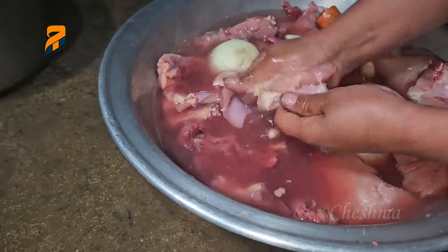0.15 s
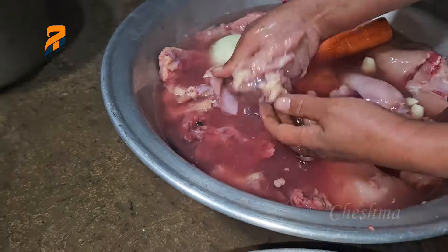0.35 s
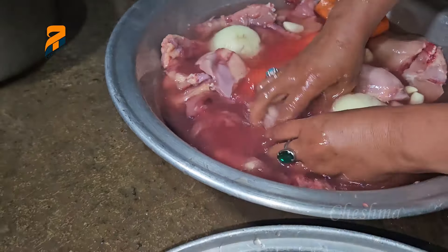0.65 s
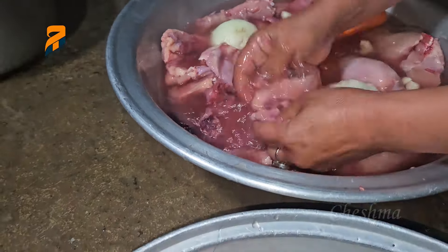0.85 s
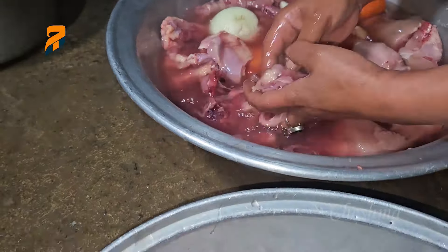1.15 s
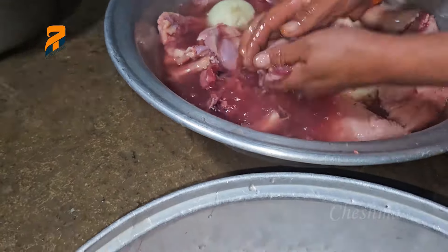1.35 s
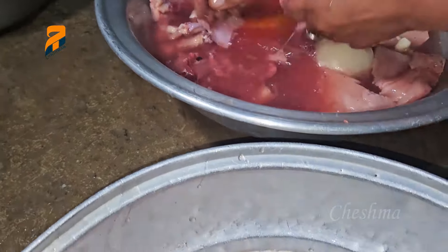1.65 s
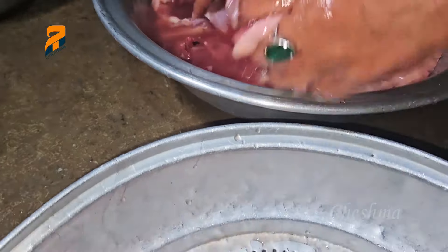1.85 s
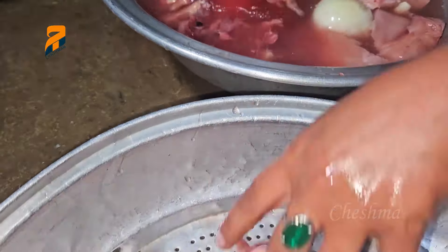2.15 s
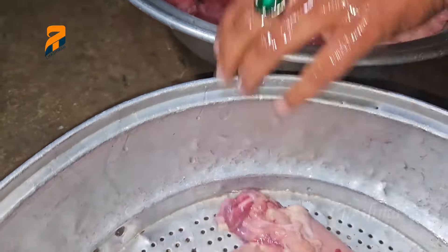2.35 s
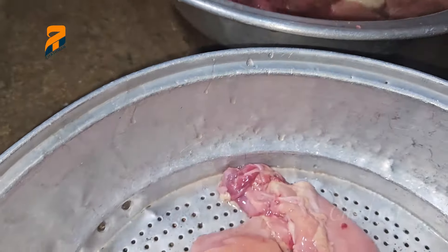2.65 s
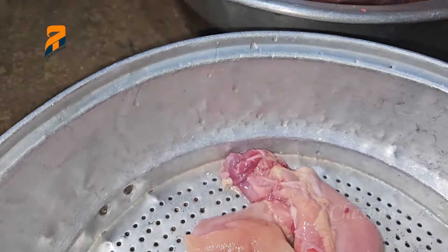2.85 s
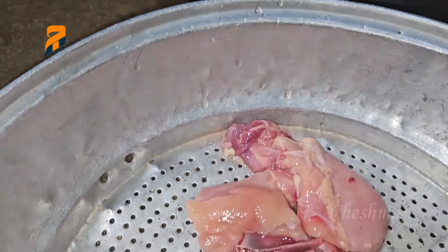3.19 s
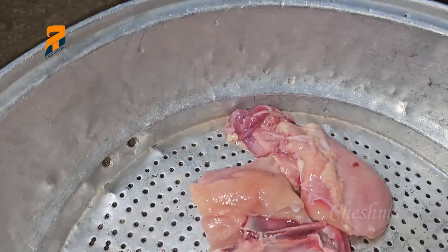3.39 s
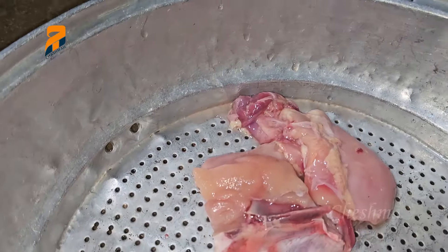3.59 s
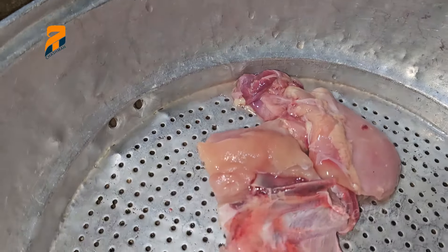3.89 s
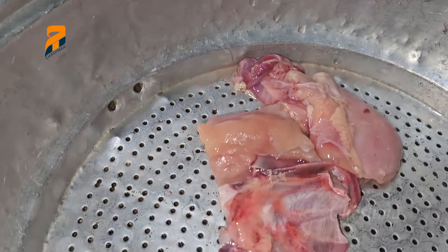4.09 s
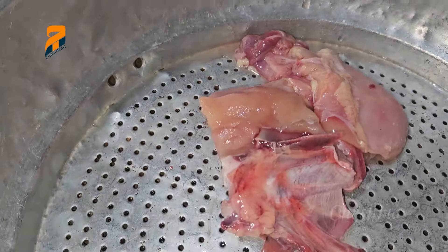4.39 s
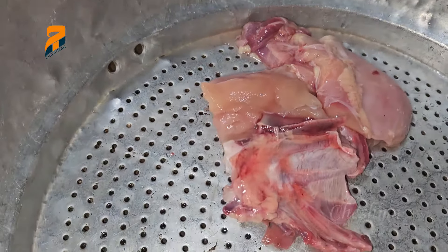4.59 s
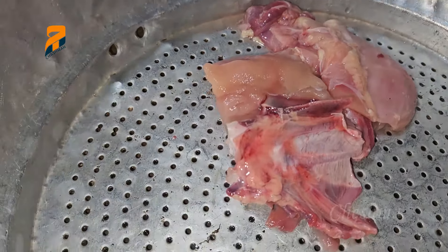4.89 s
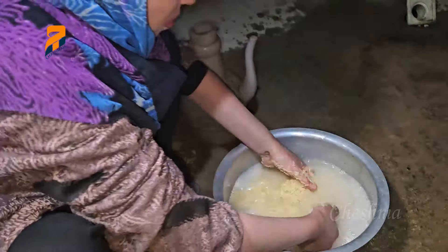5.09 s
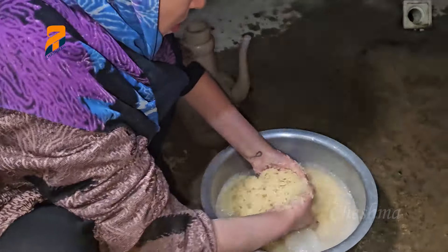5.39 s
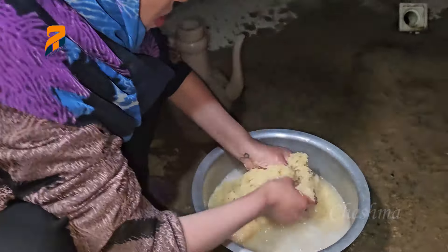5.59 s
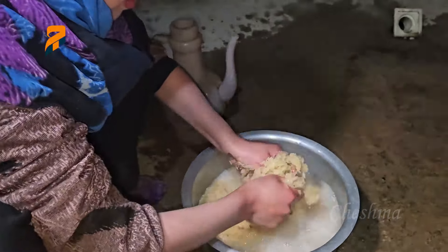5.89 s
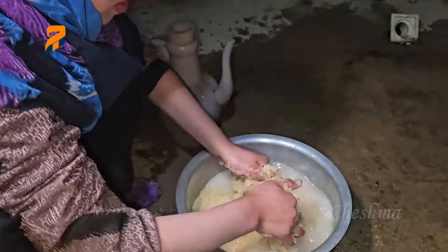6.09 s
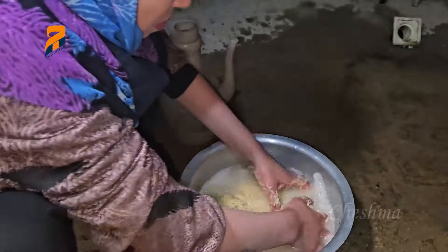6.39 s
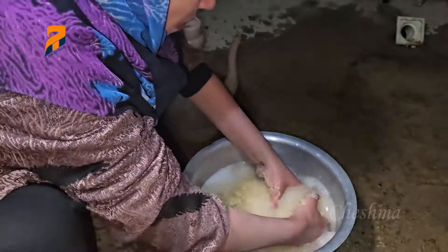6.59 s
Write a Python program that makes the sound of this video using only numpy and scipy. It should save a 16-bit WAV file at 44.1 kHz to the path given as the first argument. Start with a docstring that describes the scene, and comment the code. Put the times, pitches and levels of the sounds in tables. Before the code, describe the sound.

Close stereo sound of washing food in metal basins on a hard floor in a small room. Water swishes brightly from the start; a tiny wet squeak at 0.1 s leads into a heavy, rough, hollow shove at about 0.25 s, shaking the room's lowest tones. Splashes follow at 0.6 and 0.9 s, with a small rising bloop at 0.8. Hard, dry metal cracks strike at 0.7, 1.4, 2.1 and 2.4 s, among quick splashes and crowded drips from 2.2 to 2.6. The water thins around 3 s, with duller sloshing and a strong thud at 3.6. Another splash at 3.9 precedes a loud bright crack at 4.2, then plinking drops. Low rumble grows until about 5.3. A full splash and clustered heavy bumps land at 5.0-5.2 s. Afterwards rice is rubbed in soft, pulsing swishes, with faint knocks at 5.9 and 6.4.

```python
"""Water swishes, fizzes and drips as hands rinse meat and then rice in metal basins in a small hard room.
A wet finger squeaks, steps thud, heavy things are set down or dragged, and a ring or bone cracks on metal.
Water is filtered noise with resonant bubbles; drops are chirped bubbles; solids are struck modes.
The first heavy blow also rings low room modes; drops, bloops and cracks feed a diffuse reverberation.
Two microphone ports stand a hand apart, the right one read with a varying lag."""
import sys
import numpy as np
from scipy import signal
from scipy.io import wavfile
from scipy.ndimage import map_coordinates

SR = 44100
rng = np.random.default_rng(int(sys.argv[2]) if len(sys.argv) > 2 else 0)


def materialize(psi):
    """Save the field psi as 16-bit PCM at rate SR to the path in sys.argv[1].

    A 1-D psi becomes a single channel; in a 2-D psi each row is a channel.
    """
    bounded = np.clip(np.atleast_2d(psi).T, -1, 1)
    quanta = np.round(bounded * 32767).astype(np.int16)
    wavfile.write(sys.argv[1], SR, quanta)


N = 297234

# Stirring of the water by the hands: t/s, swish level/dB, slosh level/dB
STIRRING = [(0.0, -40, -74), (0.2, -50.5, -79), (0.36, -50, -69.5), (0.82, -48, -54), (1.05, -59.5, -67.5),
            (1.28, -58, -63.5), (1.55, -48.5, -76.5), (2.0, -56, -66), (2.31, -62.5, -67.5),
            (2.6, -55.5, -69), (2.95, -52.5, -81), (3.2, -60, -65), (3.7, -57, -63.5), (4.2, -47, -69.5),
            (4.5, -58, -65.5), (5.0, -59.5, -70), (5.3, -55, -58.5), (5.5, -60.5, -81), (5.8, -50.5, -70),
            (6.22, -48, -73), (6.42, -61, -62), (6.74, -62.5, -84.5)]
# Handfuls thrown up and falling back: middle of rise t/s, hold from there/s, swish level/dB, slosh level/dB
SPLASHES = [(0.413, 0.23, -53, -81), (0.628, 0.073, -40, -63), (0.901, 0.044, -45.5, -52),
            (1.533, .07, -53, -68.5), (1.71, 0.1, -42.5, -66), (2.051, 0.15, -49.5, -55.5),
            (2.333, 0.062, -47.5, -81), (2.454, 0.16, -52, -62.5), (2.607, 0.12, -46.5, -62.5),
            (2.785, 0.16, -46, -67.5), (3.315, 0.026, -68.5, -52.5), (3.484, 0.11, -59.5, -51.5),
            (3.929, 0.042, -43, -60), (4.122, 0.13, -48.5, -80), (4.833, 0.027, -73, -48.5),
            (5.075, 0.049, -40, -38.5), (5.631, 0.14, -48, -65.5), (5.853, 0.18, -49.5, -67.5),
            (6.079, 0.067, -42.5, -68)]
SPLASH_RISE_S, SPLASH_T60_S = 0.098, 0.14
# Relative noise density of the bright swish: f/Hz, level/dB per Hz
SWISH_SPECTRUM = [(600, -60), (1000, -25), (1500, -8), (2500, -8), (4000, -8), (7500, -9), (12000, -12.5),
                  (16000, -25.5)]
# Relative noise density of the dull slosh: f/Hz, level/dB per Hz
SLOSH_SPECTRUM = [(150, -26), (300, -2), (550, 0.5), (1000, -9), (2500, -26)]
# Correlation of left and right noise: f/Hz, likeness (0 to 1)
LIKENESS = [(100, 0.72), (300, 0.085), (700, 0.067), (2000, 0.02), (12000, 0.067)]
# Fizz of grains and droplets, relative to the swish
FIZZ_DB, FIZZ_PER_S, FIZZ_CYCLES = -8, 380, 18
# Lag between the ports and level of the far rumble over time: t/s, lag of the right port/ms, gain of the far
# rumble/dB
LAG_AND_RUMBLE = [(0, 0.25, 18), (1.2, 0.23, 19), (4.95, 0.31, 27), (5.0, -0.3, 29.5), (5.3, 0.081, 29),
                  (5.45, 0.0064, 11.5), (6.74, 0.051, 13.5)]
# Resonances of the far rumble: f/Hz, width/Hz, level before the gain/dB
RUMBLE_MODES = [(56.5, 13, -98), (128.2, 41, -84), (220, 20, -96)]
RUMBLE_LUMPS_DB = 3

# Drops and pops of the water: t/s, relative level/dB, starting f/Hz
DROPS = [(0.057, -59, 1310), (0.171, -54, 796), (0.518, -48.5, 1310), (0.616, -42.5, 1360),
         (0.974, -57, 793), (0.982, -45.5, 4180), (1.039, -50.5, 1290), (1.271, -52, 1404),
         (1.488, -48, 6900), (1.507, -40, 5560), (1.607, -52, 5700), (2.177, -44, 3520),
         (2.206, -45.5, 5140), (2.215, -40.5, 1754), (2.241, -39, 6020), (2.261, -51, 1126),
         (2.351, -40, 1950), (2.359, -45, 5730), (2.437, -39.5, 1650), (2.448, -50.5, 4940),
         (2.501, -46, 1390), (2.592, -47.5, 4280), (3.386, -61.5, 1310), (3.823, -45.5, 596),
         (4.355, -43, 4840), (4.397, -43, 3240), (4.417, -41.5, 1790), (4.505, -55.5, 2900),
         (4.66, -58, 3680), (4.681, -50.5, 1940), (4.718, -51.5, 2060), (5.124, -36, 3680),
         (5.305, -57, 2530), (5.355, -49.5, 2480), (5.961, -52, 1330), (6.298, -37.5, 8480),
         (6.699, -55, 2870)]
DROP_T60_S, DROP_SHRINK = 0.024, 0.34  # ring time at 1 kHz; power by which it shortens with pitch
DROP_ROOM_DB = -8.5  # share of drops and bloops sent to the room
ROOM_T60_S, WALL_CUT_HZ = 0.098, 2850
# A brief squeak: start t/s, end t/s, f/Hz, mean level/dB
SQUEAK = (.075, .15, 2185, -50)

# Steps and shifting weight: t/s, ring level/dB, ring f/Hz, deep thump level/dB, ring t60/s
THUDS = [(0.143, -40.5, 126, -67, 0.33), (0.219, -27, 112, -54, 0.5), (0.654, -28.5, 114, -40.5, 0.14),
         (0.912, -41.5, 107, -37, 0.68), (1.368, -49, 196.4, -41.5, 0.31),
         (1.939, -34.5, 137.7, -44.5, 0.41), (2.196, -31, 114, -45.5, 0.083), (2.242, -35, 140, -67, 0.22),
         (2.36, -45, 118.3, -50, 0.9), (2.511, -27.5, 130, -45, 0.13), (2.548, -31.5, 139.3, -49, 0.34),
         (2.724, -35, 145, -50, 0.48), (2.96, -48.5, 119, -65, 0.59), (3.483, -44, 136, -43.5, 0.6),
         (3.612, -24, 140.4, -39, 0.25), (3.801, -34.5, 147.5, -64, 0.16), (4.023, -51.5, 99, -53, 0.26),
         (4.894, -37.5, 137, -63, 0.22), (5.009, -36, 135, -53, 0.17), (5.063, -29.5, 113, -55, 0.19),
         (5.119, -25.5, 130, -65, 0.19), (5.173, -28, 139.6, -64, 0.23), (5.634, -53, 147, -70, 0.39),
         (5.699, -38.5, 150, -60, 0.44), (6.365, -30, 122, -64, 0.25), (6.505, -42.5, 146.5, -61, 0.33)]
DEEP_HZ, DEEP_T60_S = 51.8, 0.49
PUFF_DB, PUFF_T60_S = -14, 0.17  # dull noise in each step, relative to the ring
# Heavy blows and drags: t/s, push level/dB, rise/s, t60/s, relative rattle level/dB, relative low body level/dB
BLOWS = [(0.243, -11, 0.043, 0.27, -0.5, -1.5), (0.644, -41.5, 0.008, 0.43, -10, -2),
         (5.061, -20, 0.01, 0.32, -21, -24), (5.129, -29, 0.0051, 0.19, -22, -18),
         (5.159, -15, 0.0014, 0.13, -21.5, -24.5)]
# Relative noise density of the blows' rattle: f/Hz, level/dB per Hz
RATTLE_SPECTRUM = [(150, 10.5), (320, 17.5), (700, -2.5), (1300, 11), (2200, 17), (4500, 1.5), (9600, -25),
                   (14000, -84.5)]
# Low hollow body of the blows: f/Hz, width/Hz, relative level/dB
HOLLOW_MODES = [(175.4, 48, 5), (217.2, 6.2, -1), (278.3, 31, -6.5), (355, 30, -8)]
# Upper body of the vessel: f/Hz, width/Hz, relative level/dB
VESSEL_MODES = [(480, 50, -13), (557, 21, 5.5), (642, 43, -11), (948, 33, -13)]
# Low room modes rung by the first blow: f/Hz, width/Hz, relative level/dB
ROOM_MODES = [(26.8, 3, -6), (66.3, 5, -2.5), (75, 2.46, -1), (113, 4.3, -2)]

# Hard cracks on metal: t/s, level/dB, favoured f/Hz, relative treble level/dB, relative low knock level/dB,
# decay constant of the rattle/s, share sent to the room/dB
CRACKS = [(0.69, -21, 3040, -32, -37, 0.0029, -5), (1.39, -13, 3250, -35, -16.5, 0.0012, -12),
          (2.112, -13, 4800, -0.5, -7, 0.0048, -4.5), (2.379, -21.5, 2680, -31, -12, 0.0017, -7),
          (3.802, -39, 1420, -12, -8, 0.01, -4.5), (4.183, -9.5, 1900, -2.5, -15.5, 0.0026, -5.5),
          (5.163, -25, 2960, -29, -6.5, 0.003, -3.5), (5.915, -36.5, 3500, 4, -4, 0.018, -6),
          (6.383, -27, 1900, -32, -2.5, 0.0023, -6.5)]
# Wet, damped modes of the basin: f/Hz, relative strength/dB, t60/s
BASIN_MODES = [(1066, -18, 0.12), (1318, 5, 0.013), (1980, 10, 0.017), (2149, 8, 0.02), (2900, -5, 0.045),
               (3350, -7.5, 0.029), (4190, -3, 0.06), (4930, -12.5, 0.03), (6220, -18, 0.052)]
CRACK_RING_DB = -2
FAVOUR_DB_PER_OCT2 = 3.0  # modes far from the favoured pitch are struck less
KNOCK_HZ, KNOCK_WIDTH_HZ = 800, 750
# Large bubbles that glide up as they surface: t/s, level/dB, from f/Hz, to f/Hz, length/s
BLOOPS = [(0.784, -32.5, 990, 1910, 0.013), (0.785, -45, 750, 855, 0.016), (3.094, -45.5, 264, 428, 0.025),
          (4.058, -46.5, 290, 372, 0.011)]
CUTOFF_HZ = 16700


def amp(db):
    """Logarithmic level: decibels to amplitude gain."""
    return 10 ** (np.asarray(db) / 20)


def rms_one(x):
    """Normalisation of power: scale to rms 1."""
    return x / np.sqrt(np.mean(x ** 2) + 1e-20)


def in_time(rows):
    """Linear interpolation in time: each column of a curve, one value a sample."""
    s, *columns = np.transpose(rows)
    return [np.interp(np.arange(N) / SR, s, column) for column in columns]


def at_hz(points, hz):
    """Interpolation of a spectrum on a logarithmic frequency axis."""
    table_hz, values = np.transpose(points)
    return np.interp(np.log(hz), np.log(table_hz + 1), values)


def drift(rate):
    """Low-passed random process: slow chance of spread 1, computed every 20 samples."""
    r = np.exp(-40 * np.pi * rate / SR)
    white = rng.standard_normal(N // 20 + 2002)
    slow = signal.lfilter([1], [1, -2 * r, r * r], white)[2000:]
    return np.interp(np.arange(N) / 20, np.arange(len(slow)), rms_one(slow - slow.mean()))


def resonance(x, hz, width_hz):
    """Damped resonator: a pole pair whose radius sets the width, with gain 1 on top."""
    r = np.exp(-np.pi * width_hz / SR)
    poles = [1, -2 * r * np.cos(2 * np.pi * hz / SR), r * r]
    return signal.lfilter([(1 - r * r) / 2, 0, (r * r - 1) / 2], poles, x)


def modes(x, table):
    """Modal superposition: parallel resonances, each of rms set by its level."""
    return sum(amp(db) * rms_one(resonance(x, hz, width)) for hz, width, db in table)


def banded(spectrum, white, patchy_db):
    """Band-filtered noise: half-octaves with their own level, flicker and stereo correlation; rms 1."""
    out, together = 0, drift(25)
    edges = 125 * 2 ** np.arange(0, 7.3, .5)
    for k, (low, high) in enumerate(zip(edges, edges[1:])):
        band = signal.butter(2, [low, high], "band", fs=SR, output="sos")
        mid, side = signal.sosfilt(band, white[k % 2])
        hz = np.sqrt(low * high)
        alike = np.clip(at_hz(LIKENESS, hz), 0, 1)
        flicker = patchy_db * (1.23 * together + drift(9.4))
        stereo = np.sqrt(1 + alike) * mid + np.sqrt(1 - alike) * side * [[1], [-1]]
        out = out + amp(at_hz(spectrum, hz) + flicker) * stereo
    return rms_one(out)


def add(out, s, sound, pan_db):
    """Superposition: mix a short sound in at a time, with a level difference between the sides."""
    at = round(s * SR)
    out[:, at:at + len(sound)] += amp([[pan_db / 2], [-pan_db / 2]]) * sound[:N - at]


def water_levels():
    """Addition of powers: stirring plus every splash's rise, hold and fall; gains of swish and slosh."""
    t, power = np.arange(N) / SR, amp(in_time(STIRRING)) ** 2
    for start, hold, *dbs in SPLASHES:
        rise = np.clip((t - start) / SPLASH_RISE_S + .5, 0, 1) ** 2
        fall = np.clip(t - start - hold, 0, 1)
        shape = rise * amp(-60 * fall / SPLASH_T60_S)
        power = power + np.outer(amp(dbs), shape) ** 2
    return np.sqrt(power)


def spray(per_s, spread_db, bed):
    """Random impulses: clicks of tiny droplets of uneven size over smooth noise."""
    sizes = amp(spread_db * np.minimum(rng.exponential(1, (2, 2, N)), 2.5))
    born = rng.random(N) < per_s / SR
    return rng.standard_normal((2, 2, N)) * (bed + born * sizes)


def bubbles(per_s, cycles, low_hz, high_hz):
    """Bubble resonance: random impulses ring a few cycles at scattered pitches, in bursts; rms 1."""
    sizes = amp(6 * np.minimum(rng.exponential(1, N), 2.5)) * rng.choice([-1, 1], N)
    born = rng.random(N) < per_s * amp(4.0 * drift(6)) / SR
    pitches, dealt = np.geomspace(low_hz, high_hz, 14), rng.integers(0, 14, N)
    out = 0
    for k, (hz, pan) in enumerate(zip(pitches, rng.normal(0, 1.5, 14))):
        impulses = sizes * born * (dealt == k) + 1e-18
        ring = resonance(impulses, hz, hz / cycles) / np.sqrt(hz)
        out = out + amp([[pan], [-pan]]) * ring
    return rms_one(out)


def water():
    """Turbulence and bubble resonance: swish with fizz and slosh with gulps follow the water levels."""
    bright, dull = water_levels()
    swish = banded(SWISH_SPECTRUM, spray(per_s=3000, spread_db=5.0, bed=0.65), patchy_db=1.95)
    slosh = banded(SLOSH_SPECTRUM, rng.standard_normal((2, 2, N)), patchy_db=2.5)
    fizz = amp(FIZZ_DB) * bubbles(FIZZ_PER_S, FIZZ_CYCLES, low_hz=853, high_hz=4800)
    gulps = amp(-12) * bubbles(per_s=99, cycles=13.0, low_hz=256, high_hz=870)
    return bright * (swish + fizz) + dull * (slosh + gulps)


def far_rumble():
    """Resonant filtering: low-passed noise through wide resonances, uneven in level, over faint hiss."""
    dull = signal.sosfilt(signal.butter(2, 300, fs=SR, output="sos"), rng.standard_normal(N))
    gain = amp(in_time(LAG_AND_RUMBLE)[1] + RUMBLE_LUMPS_DB * drift(1.7))
    hiss = amp(-92.5) * rng.standard_normal((2, N))
    return gain * modes(dull, RUMBLE_MODES) + hiss


def drops():
    """Bubble oscillation: a short ring rising in pitch, a splash around it and a wide tick at its start."""
    out, t = np.zeros((2, N)), np.arange(SR // 10) / SR
    splashes = rng.standard_normal((len(DROPS), len(t)))
    sides = rng.normal(1, 2.5, len(DROPS))
    for (s, db, hz), noise, pan in zip(DROPS, splashes, sides):
        t60 = DROP_T60_S * (1000 / hz) ** DROP_SHRINK
        chirp = np.sin(2 * np.pi * hz * t * (1 + 4.3 * t))
        bubble = chirp * amp(-60 * t / t60) * (1 - np.exp(-t / 0.00063))
        splash = rms_one(resonance(noise, hz, 0.25 * hz)) * amp(-60 * t / (1.5 * t60))
        tick = rms_one(resonance(noise, min(1.5 * hz, 12000), 6.0 * hz)) * amp(-60 * t / .012)
        add(out, s, amp(db) * (5.63 * bubble + 2.2 * splash + 0.15 * tick), pan)
    return out


def room(x):
    """Diffuse reverberation: a dense tail of its own on each side, the treble dying sooner."""
    t = np.arange(SR // 2) / SR
    noise = rng.standard_normal((2, 2, len(t))) * np.minimum(t / .005, 1)
    dull = signal.sosfilt(signal.butter(1, WALL_CUT_HZ, fs=SR, output="sos"), noise[0])
    tail = dull * amp(-60 * t / ROOM_T60_S) + .5 * noise[1] * amp(-60 * t / (0.6 * ROOM_T60_S))
    return signal.fftconvolve(x[None], tail / np.sqrt(np.sum(tail[0] ** 2)), axes=1)[:, :N]


def squeak():
    """Frictional oscillation: a wet finger slips on metal, giving a gated sine of unsteady level."""
    start, end, hz, db = SQUEAK
    t = np.arange(N) / SR
    gate = np.clip(np.minimum(t - start, end - t) / .006, 0, 1)
    return amp(db + 3 * drift(60)) * gate * np.sin(2 * np.pi * hz * t)


def floor():
    """Modal excitation: each step rings two floor modes over a deeper pair and a puff of dull noise."""
    out, t = np.zeros((2, N)), np.arange(SR // 2) / SR
    phases = rng.uniform(0, 2 * np.pi, (len(THUDS), 2))
    puffs = resonance(rng.standard_normal((len(THUDS), len(t))), 190, 87)
    turn = 2 * np.pi * t
    for (s, db, hz, deep_db, t60), (near, deep), noise in zip(THUDS, phases, puffs):
        ring = np.sin(hz * turn) + 0.48 * np.sin(0.786 * hz * turn + near)
        thump = np.sin(DEEP_HZ * turn + deep) + 1.16 * np.sin(1.34 * DEEP_HZ * turn + near)
        sound = amp(db - 60 * t / t60) * ring * (1 - np.exp(-t / .009))
        sound = sound + amp(deep_db - 60 * t / DEEP_T60_S) * thump * (1 - np.exp(-t / .03))
        puff = rms_one(noise) * (1 - np.exp(-t / 0.011))
        sound = sound + amp(db + PUFF_DB - 60 * t / PUFF_T60_S) * puff
        add(out, s, sound, 1.6 * np.cos(deep))  # the random phase also sets the side
    return out


def blows():
    """Forced vibration: heavy pushes drive a rattle and hollow bodies; the first rings room modes."""
    t, (force, rattle, low) = np.arange(N) / SR, np.zeros((3, N))
    for s, db, rise, t60, rattle_db, low_db in BLOWS:
        after = np.maximum(t - s, 0)
        push = amp(db) * np.minimum(after / rise, 1) ** 2 * amp(-60 * np.minimum(after / t60, 3))
        force = force + push
        rattle = rattle + amp(rattle_db) * push
        low = low + amp(low_db) * push

    def body(push, table):
        """Modal response to noise shaped by the push, at the rms of the push."""
        return modes(push * rng.standard_normal(N), table) * np.sqrt(np.mean(push ** 2))

    rough = banded(RATTLE_SPECTRUM, rng.standard_normal((2, 2, N)), patchy_db=-1.8)
    since = t - BLOWS[0][0]
    # a short pulse after a wider one of opposite sign
    slam = np.exp(-((since - .022) / 0.0015) ** 2) - 0.5 * np.exp(-((since - .008) / 0.0056) ** 2)
    bodies = amp(-2.0) * body(low, HOLLOW_MODES) + amp(-16) * body(force, VESSEL_MODES)
    return rattle * rough + bodies + amp(-40.0) * modes(slam, ROOM_MODES)


def peak_one(x):
    """Normalisation of amplitude: scale to peak 1."""
    return x / np.abs(x).max()


def cracks():
    """Impact excitation: rattling contacts drive damped basin modes, a snap and a knock; also the room send."""
    (out, sent), t = np.zeros((2, 2, N)), np.arange(SR // 4) / SR
    rattles = rng.standard_normal((len(CRACKS), len(t)))
    strengths = rng.normal(0, 3.0, (len(CRACKS), len(BASIN_MODES)))
    bright = signal.butter(1, [5000, 11000], "band", fs=SR, output="sos")
    for (s, db, favoured_hz, treble_db, knock_db, decay, room_db), noise, luck in zip(CRACKS, rattles, strengths):
        rattle = noise * np.exp(-t / decay) * (1 - np.exp(-t / .0005))
        ring = 0
        for (hz, level, t60), chance in zip(BASIN_MODES, luck):
            strike_db = level + chance - FAVOUR_DB_PER_OCT2 * np.log2(hz / favoured_hz) ** 2
            width_hz = np.log(1000) / np.pi / t60
            ring = ring + amp(strike_db) * t60 * resonance(rattle, hz, width_hz)
        snap = peak_one(resonance(rattle, favoured_hz, 1.4 * favoured_hz))
        strike = peak_one(amp(CRACK_RING_DB) * peak_one(ring) + snap)
        treble = amp(treble_db) * signal.sosfilt(bright, rattle)
        knock = resonance(resonance(rattle, KNOCK_HZ, KNOCK_WIDTH_HZ), KNOCK_HZ, KNOCK_WIDTH_HZ)
        sound = amp(db) * (strike + treble + amp(knock_db) * peak_one(knock))
        add(out, s, sound, 1.5)
        add(sent, s, amp(room_db) * sound, 0)
    return out, sent


def bloops():
    """Frequency glide: a surfacing bubble as a near sine under a rounded swell, its pitch rising."""
    out = np.zeros((2, N))
    for s, db, from_hz, to_hz, length in BLOOPS:
        u = np.arange(int(length * SR)) / (length * SR)
        phase = 2 * np.pi * np.cumsum(from_hz + (to_hz - from_hz) * u) / SR
        add(out, s, amp(db) * np.sqrt(np.sin(np.pi * u)) * np.sin(phase), 1)
    return out


def scene():
    """Superposition and time difference: all sources, the lag between the ports, and the room."""
    near = drops() + bloops()
    hard, sent = cracks()
    left, right = water() + far_rumble() + near + squeak() + floor() + blows() + hard
    late = np.arange(N) - in_time(LAG_AND_RUMBLE)[0] * SR / 1000
    direct = np.array([left, map_coordinates(right, [late], order=3, mode="nearest")])
    return direct + room((sent + amp(DROP_ROOM_DB) * near).mean(0))


def record(dry):
    """Frequency response: the microphone has a dip near 10 kHz and the top is cut."""
    dipped = dry - .75 * resonance(dry, 10200, 2200)
    return signal.sosfilt(signal.cheby2(14, 60, CUTOFF_HZ, fs=SR, output="sos"), dipped)


dry = scene()
out = record(dry)
materialize(out)
```